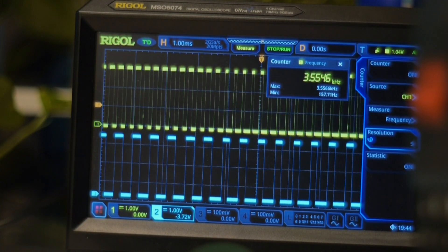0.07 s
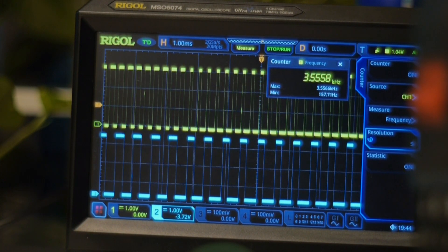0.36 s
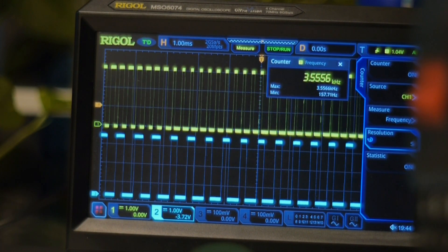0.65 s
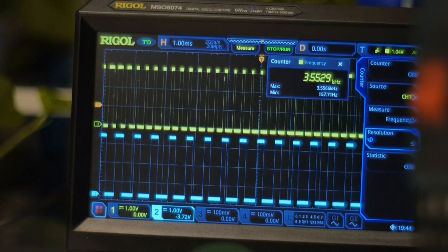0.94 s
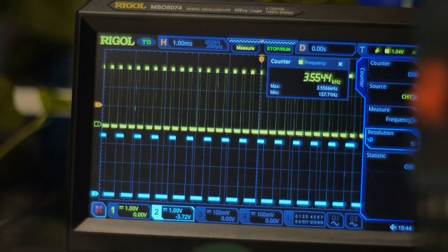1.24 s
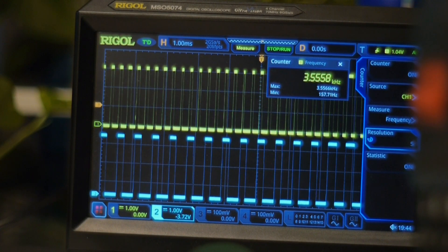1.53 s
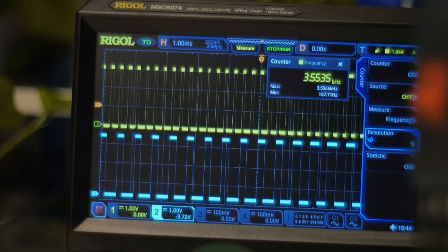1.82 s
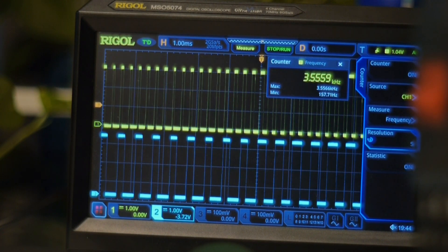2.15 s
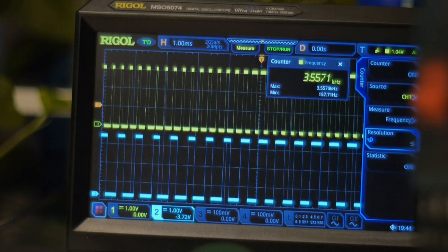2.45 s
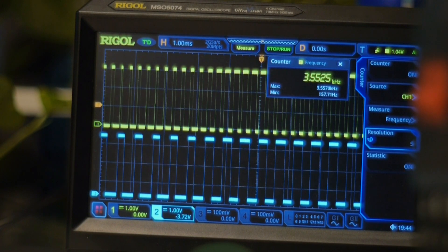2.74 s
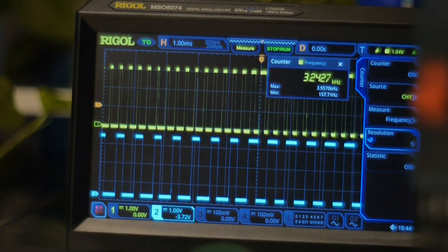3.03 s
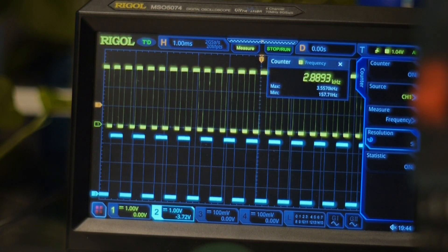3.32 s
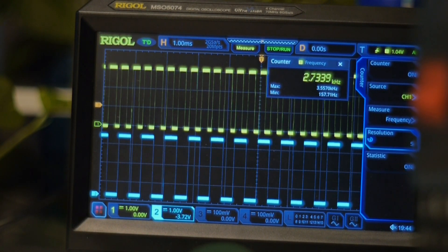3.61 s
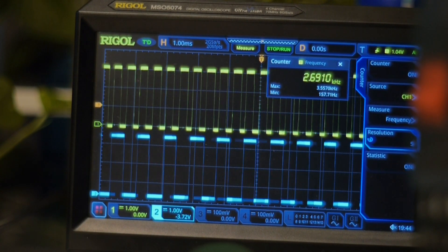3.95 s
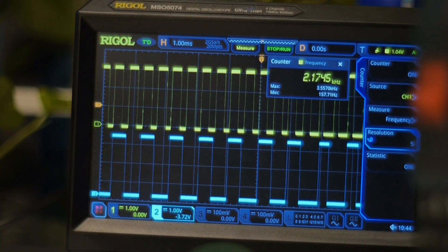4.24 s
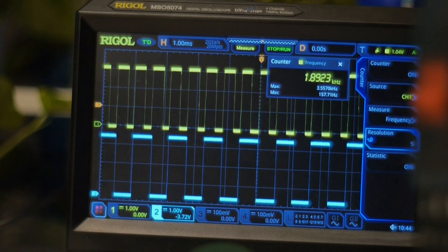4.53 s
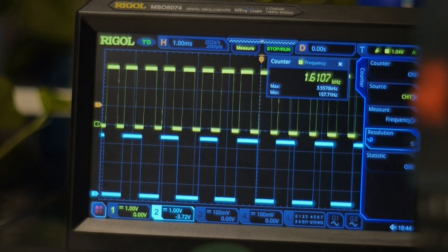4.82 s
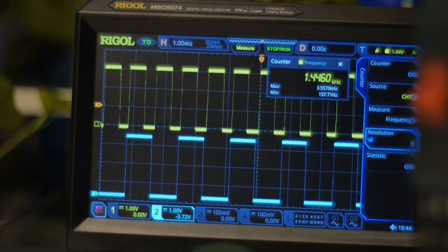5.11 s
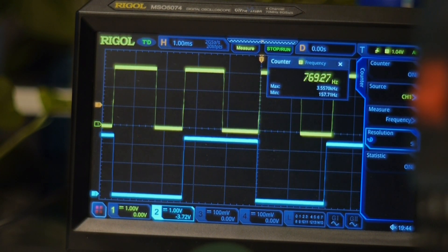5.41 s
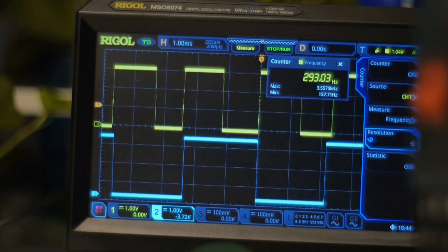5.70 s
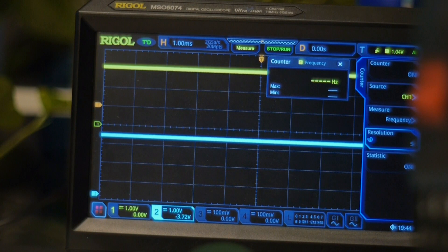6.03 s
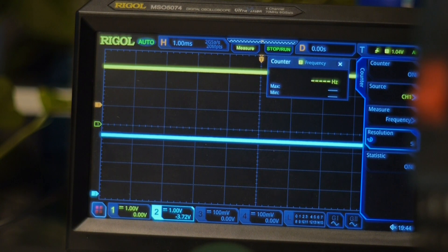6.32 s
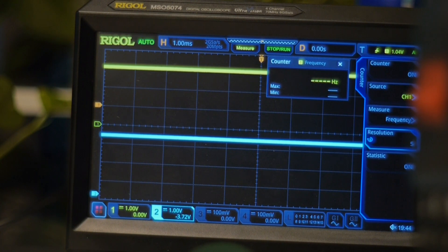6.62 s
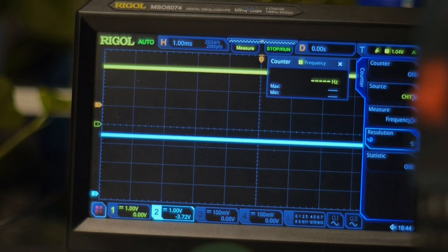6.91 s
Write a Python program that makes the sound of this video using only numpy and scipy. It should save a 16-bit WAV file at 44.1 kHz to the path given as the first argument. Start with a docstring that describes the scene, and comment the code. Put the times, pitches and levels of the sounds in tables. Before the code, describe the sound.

A small electric motor spins a disk at high speed, its sliding contacts hissing under a steady high whine. After nearly three seconds it slows in stages, the whine gliding down and the hiss growing duller and weaker. The rotor catches with a ringing metallic click, followed by a soft knock as the mount settles. Faint ventilation remains in the quiet room, heard in stereo.

```python
"""A bench in a quiet, ventilated room, in stereo. A small electric motor spins a disk at 430 rev/s,
slows in stages and stops. Its sliding contacts hiss through the housing's resonances and keep the disk
ringing. Multiples of the shaft rate whine and glide down; the bench trembles faintly.
The rotor catches with a ringing metallic click, then the mount settles with a soft knock."""
import sys
import numpy as np
from scipy import signal
from scipy.fft import rfft, irfft, next_fast_len
from scipy.io import wavfile
from scipy.ndimage import uniform_filter1d

SR = 44100
rng = np.random.default_rng(int(sys.argv[2]) if len(sys.argv) > 2 else 0)


def store_pcm(level_fs):
    """Save levels as 16-bit WAV."""
    pcm = np.round(np.clip(level_fs, -1, 1) * 32767).astype(np.int16)
    wavfile.write(sys.argv[1], SR, np.atleast_2d(pcm).T)


N = 311327
TIME_S = np.arange(N) / SR
FREQ_HZ = np.maximum(np.arange(N // 2 + 1) * SR / N, 1)
FULL_SPEED_HZ, KNOCK_S = 429.6, 5.6795

# ventilation spectrum: f/Hz, relative level/dB
ROOM_COLOUR = [(15, -55.5), (25, -14), (58, -13), (102, -15), (140, -10), (180, -11.5), (279, -4.5),
               (309, -6.5), (798, -12), (980, -13.5), (1060, -16.5), (1440, -15), (2170, -23.5),
               (4000, -30.5), (11500, -35.5), (15000, -76), (22000, -120)]
# diffuse sound, wider at short wavelengths: f/Hz, side gain/dB
ROOM_SIDE = [(100, -14.5), (400, -13), (900, -17.5), (2000, -10.5), (4000, 6), (12000, -4)]
# spells of bench tremble: centre t/s, length/s, level/dB
TREMBLE_SPELLS = [(3.45, 0.41, -74), (4.13, 0.055, -72), (4.5, 0.22, -75)]
# knock modes: f/Hz, relative level/dB, t60/s
KNOCK_MODES = [(565, -4.5, 0.27), (650, -1, 0.15), (820, -13, .06), (1260, -20, .06), (1800, -18, .06),
               (2500, -11, 0.15)]
# knock noise spectrum: f/Hz, relative level/dB
KNOCK_COLOUR = [(200, -27), (650, -1), (1700, -4), (2600, -3), (4000, -12), (9000, -23), (14000, -34)]
# the stop, light touch then blow: t/s, level/dB
STOP_HITS = [(5.397, -40.5), (5.4008, -31)]
# click noise spectrum: f/Hz, relative level/dB
CLICK_COLOUR = [(100, -30), (450, -18), (700, -8), (1000, -1), (1430, -10), (1720, 7), (2300, -7),
                (2650, 0), (3850, 5), (4400, -13), (4750, -7), (5200, -4), (5500, 4), (6500, -3),
                (7100, 2.5), (8000, -10), (9200, 3.5), (11000, -9.5), (14000, -23)]
# modes of disk and mount: f/Hz, level/dB, t60/s
DISK_MODES = [(1700, -54, .12), (1785, -54, .26), (2015, -58, .13), (2625, -57, .55), (2708, -56.5, .5),
              (3170, -60, .2), (3467, -58, .3), (3780, -54, .1), (5440, -56, .25), (5650, -55, .2),
              (5890, -56, .35), (6255, -61, .32), (7025, -58, .28), (9150, -58, .22), (9615, -62, .2),
              (9890, -61, .2)]
# shaft rate: t/s, f/Hz
SHAFT_SPEED = [(2.0, 429.7), (2.735, 429.6), (2.8, 396.7), (2.9, 368), (3.04, 344), (3.4, 331),
               (3.68, 324.5), (3.75, 315.5), (3.85, 297.5), (3.93, 278), (4.03, 267.5), (4.1, 246),
               (4.2, 229.5), (4.39, 217.6), (4.55, 203.9), (4.7, 187.4), (4.8, 181), (4.85, 174.5),
               (4.95, 150), (5.05, 128), (5.2, 105.1), (5.25, 91.8), (5.3, 67.5), (5.39, 33.7)]
# whines; fractional orders are bearing tones
# order: base level at full speed/dB, change per halving of speed/dB, roughness/1, waver/dB
WHINE_ORDERS = { 1: (-61.5, -24, .067, .8), 4: (-62, -8, .15, 1.1), 8: (-53.3, -24, .27, 1.0),
                11.635: (-57, -18, .4, 2), 12: (-72, -1, .52, 2.3), 12.4: (-72, -3, .85, 2.5),
                12.635: (-58.5, -26, .5, 2.5), 16: (-66, -5, .38, 1.8), 20: (-73, -7, .4, 2.5),
                24: (-79, -1, .8, 2), 26: (-79, -3, .5, 2.5), 28.5: (-81.5, -1, .6, 2),
                29: (-59.6, -10, .3, 2)}
# resonances each whine can drive; order: rows of f/Hz, width/Hz, peak level/dB
WHINE_RESONANCES = { 4: [(1322, 52, -46), (1276, 50, -50.5), (1095, 150, -48.5), (900, 150, -48.5),
                    (805, 70, -48.5), (715, 30, -56), (530, 90, -71), (440, 70, -67)],
                    8: [(3165, 250, -43.5), (3020, 70, -50), (2800, 110, -57), (1735, 90, -53.5),
                    (1590, 100, -50.5), (1130, 90, -62), (900, 130, -57.5)], 12: [(3840, 240, -54.5),
                    (2540, 200, -52), (1540, 200, -53), (1120, 180, -52.5)], 12.4: [(2780, 280, -54.5),
                    (2400, 280, -55), (1720, 150, -57), (1320, 150, -56.5)], 16: [(3760, 320, -48),
                    (3440, 110, -49.5), (3230, 180, -41), (3080, 140, -45.5), (2890, 140, -47),
                    (2660, 300, -55), (1560, 250, -65)], 20: [(6750, 420, -49.5), (4120, 200, -59.5),
                    (3900, 200, -57), (3250, 200, -60)], 24: [(7790, 90, -52), (5400, 240, -53)],
                    26: [(5450, 170, -54)], 28.5: [(3040, 280, -55)], 29: [(10950, 1300, -50.5),
                    (9900, 140, -47), (9740, 90, -45), (9480, 400, -48), (8150, 800, -52.5),
                    (7650, 300, -55)]}
# antiresonance crossed by one low whine: order, f/Hz, width/Hz, gain/dB
WHINE_NULL = (4, 1302.5, 5, -13)
# friction voices; name: limiting level/dB, knee speed/Hz, speed exponent
FRICTION_VOICES = { "rumble": (-57, 180, 1.6), "rush": (-41, 291, 1.17), "hiss": (-36, 309, 1.41),
                   "chatter": (-57, 58, 0.71)}
# rumble and rush spectrum: f/Hz, relative level/dB
RUSH_COLOUR = [(60, -27), (200, -22.5), (280, -15), (330, -2.5), (420, -7), (570, -6), (740, -6.5),
               (950, 1), (1900, -1.8), (2400, 0.5), (3400, -0.5), (4500, -3.5), (5200, -3.5), (7000, -36)]
# hiss spectrum: f/Hz, relative level/dB
HISS_COLOUR = [(3500, -28.5), (4400, -13), (4800, -5), (5800, -1.5), (7100, -1), (7450, -4), (8600, -3.5),
               (9500, 3), (10400, -2), (11000, -7), (11900, -4), (12700, -10), (13700, -16.5), (14800, -51)]
# housing resonances (negative: antiresonances): f/Hz, width/Hz, gain/dB
HOUSING_MODES = [(380, 40, 2), (490, 30, -3.5), (540, 45, 2.5), (592, 35, -5), (630, 30, 3), (890, 50, 3),
                 (950, 30, -3), (1000, 50, 3.5), (1045, 20, 3), (1072, 20, -3), (1100, 18, 5),
                 (1136, 25, 4.5), (1182, 20, -3), (1325, 30, 4.5), (1635, 55, 4.5), (2000, 80, 2),
                 (2230, 70, 3), (2490, 200, 3), (2700, 60, -3), (3020, 70, 4), (3790, 120, 3.5),
                 (3985, 30, -7), (4645, 35, -6), (4790, 60, 3), (5315, 35, 5), (5435, 70, 6),
                 (5540, 30, -9), (5623, 35, 7), (5900, 90, 5.5), (6210, 100, 2), (6890, 90, 5),
                 (7050, 200, 2), (7730, 260, 5), (8540, 120, 2), (9210, 120, 5), (9910, 70, 5),
                 (10208, 35, 5), (10690, 160, 3), (11400, 250, 2)]
# motor's stereo image: f/Hz, side gain/dB, left minus right/dB
MOTOR_IMAGE = [(100, -17, 0), (400, -27, 0), (1100, -42, 0), (1800, -38, 0), (2300, -16.5, -.2),
               (4300, -10, -.3), (7000, -8, -.5), (9800, -7.6, -3.0), (13000, -6.3, -4.3)]
# treble phase between the microphone ports: f/Hz, left minus right/rad
PORT_PHASE = [(5800, 0), (7500, -.25), (10500, -1.0), (11800, .7), (14000, 0)]


def undb(db):
    """Decibels to gain."""
    return 10 ** (np.asarray(db) / 20)


def colour(rows, column=1):
    """Frequency table column, per bin."""
    rows = np.array(rows)
    return np.interp(np.log(FREQ_HZ), np.log(rows[:, 0]), rows[:, column])


def shape(x, gain):
    """Filter by a gain per bin."""
    size = next_fast_len(N, True)
    bins_hz = np.arange(size // 2 + 1) * SR / size
    return irfft(rfft(x, size) * np.interp(bins_hz, FREQ_HZ, gain), size)[:N]


def unit_shape(x, gain):
    """Filter, then scale to rms 1."""
    x = shape(x, gain)
    return x / np.sqrt(np.mean(x ** 2))


def peak(f_hz, centre_hz, width_hz):
    """Resonance curve of height 1; full width at half height."""
    return 1 / (1 + (2 * (f_hz - centre_hz) / width_hz) ** 2)


def bell(x, centre, width):
    """Gaussian of height 1."""
    return np.exp(-(2 * (x - centre) / width) ** 2)


def noise():
    """White noise."""
    return rng.standard_normal(N)


def walk(rate_hz):
    """Random wander, spread near 1."""
    points = rng.standard_normal(N // 8)
    return np.interp(TIME_S * rate_hz, np.arange(len(points)), points)


def decay(start_s, t60_s):
    """Exponential decay from start_s."""
    return (TIME_S >= start_s) * np.exp(-np.log(1000) * np.maximum(TIME_S - start_s, 0) / t60_s)


def ring(start_s, modes, beat_depth=0.6):
    """Struck modes; close neighbours make each beat."""
    age_s = TIME_S[TIME_S >= start_s][:SR] - start_s
    tones = 0
    for hz, db, t60_s in modes:
        beat = 1 + beat_depth * np.sin(2 * np.pi * rng.uniform(11, 53) * age_s)
        tones += undb(db - 60 * age_s / t60_s) * np.sin(2 * np.pi * hz * age_s) * beat
    before = np.sum(TIME_S < start_s)
    return np.pad(tones, (before, N - before - len(age_s)))


def speed_hz():
    """Shaft rate, per sample."""
    return np.interp(TIME_S, *np.transpose(SHAFT_SPEED))


def running(stop_s=5.405, ramp_s=.01):
    """1 while the shaft turns, 0 once stopped."""
    return np.clip((stop_s - TIME_S) / ramp_s, 0, 1)


def room_tone(mid_db=-67.5):
    """Steady ventilation noise from all sides."""
    mid, side = (unit_shape(noise(), undb(colour(ROOM_COLOUR))) * undb(mid_db) for _ in range(2))
    side = shape(side, undb(colour(ROOM_SIDE)))
    return np.array([mid + side, mid - side])


def reflections(x, count=8, first_s=.006, last_s=.05, drift_hz=9):
    """Delayed copies off nearby surfaces, each wandering in strength."""
    lags = (rng.uniform(first_s, last_s, count) * SR).astype(int)
    return sum(np.pad(x, (lag, 0), mode="reflect")[:N] * walk(drift_hz) for lag in lags) / np.sqrt(count)


def stereo(mid, scattered):
    """Scattered sound makes the treble differ between the two ports."""
    side = shape(scattered, undb(colour(MOTOR_IMAGE)))
    lean = undb(colour(MOTOR_IMAGE, column=2) / 2) * np.exp(1j * colour(PORT_PHASE) / 2)
    return np.array([shape(mid + side, lean), shape(mid - side, 1 / lean)])


def bench(sway_hz=42, sway_db=-83, boom_hz=140, boom_db=-77, knee_hz=200):
    """The motor shakes two low bench resonances."""
    sway = unit_shape(noise(), peak(FREQ_HZ, sway_hz, width_hz=28))
    boom = unit_shape(noise(), peak(FREQ_HZ, boom_hz, width_hz=26))
    spells = sum(undb(db) * bell(TIME_S, centre_s, length_s) for centre_s, length_s, db in TREMBLE_SPELLS)
    shaking = np.minimum(speed_hz() / knee_hz, 1) * running()
    return sway * spells + (sway * undb(sway_db) + boom * undb(boom_db)) * shaking


def knock(tap_db=-56, tail_db=-68, ring_db=-56, rise_s=.002):
    """The mount settles: dull tap, short ring."""
    envelope = undb(tap_db) * decay(KNOCK_S, t60_s=.026) + undb(tail_db) * decay(KNOCK_S, t60_s=.3)
    envelope = uniform_filter1d(envelope, int(rise_s * SR) + 1)
    tap = envelope * unit_shape(noise(), undb(colour(KNOCK_COLOUR)))
    onset = np.clip((TIME_S - KNOCK_S) / rise_s, 0, 1)
    return tap + undb(ring_db) * onset * ring(KNOCK_S, KNOCK_MODES)


def stop_click(crack_t60_s=0.02, rattle_gain_db=-17, rattle_t60_s=0.42, rise_s=0.0024):
    """The rotor catches: short crack, dense rattle, ringing disk."""
    envelope = sum(undb(db) * (decay(t_s, crack_t60_s) + undb(rattle_gain_db) * decay(t_s, rattle_t60_s))
                   for t_s, db in STOP_HITS)
    envelope = uniform_filter1d(envelope, int(rise_s * SR) + 1)
    crack = envelope * unit_shape(noise(), undb(colour(CLICK_COLOUR)))
    return crack + ring(STOP_HITS[-1][0], DISK_MODES)


def whine(turns, waver_hz=22, flutter_hz=220, fade_below_hz=62):
    """Shaft-locked tones swell through resonances, roughened by bearing play; they die at a crawl."""
    shaft_hz = speed_hz()
    halvings = np.log2(FULL_SPEED_HZ / shaft_hz)
    null_order, null_hz, null_width_hz, null_db = WHINE_NULL
    tones = 0
    for order, (full_db, halving_db, rough, waver_db) in WHINE_ORDERS.items():
        tone_hz = order * shaft_hz
        power = undb(full_db + halving_db * halvings) ** 2
        for hz, width_hz, peak_db in WHINE_RESONANCES.get(order, []):
            power += (undb(peak_db) * peak(tone_hz, hz, width_hz)) ** 2
        if order == null_order:
            power *= undb(null_db * bell(tone_hz, null_hz, null_width_hz)) ** 2
        phase_rad = 2 * np.pi * order * turns + rough * walk(flutter_hz)
        tone = np.sin(phase_rad) * (1 + rough * walk(flutter_hz))
        tones += np.sqrt(2 * power) * tone * undb(waver_db * walk(waver_hz))
    return tones * running() / (1 + (fade_below_hz / shaft_hz) ** 6)


def contact_gain(voice):
    """A friction voice grows with speed and levels off above its knee."""
    limit_db, knee_hz, exponent = FRICTION_VOICES[voice]
    return undb(limit_db) / np.sqrt(1 + (knee_hz / speed_hz()) ** (2 * exponent))


def chatter(width_hz=130, cutoff_hz=3500, burst_db=5.5):
    """Uneven rubbing drives the disk's lower modes, damped by the contact."""
    modes = sum(peak(FREQ_HZ, hz, width_hz) for hz, _, _ in DISK_MODES)
    rubbing = noise() * undb(burst_db * walk(rate_hz=60))
    return unit_shape(rubbing, modes / (1 + (FREQ_HZ / cutoff_hz) ** 8)) * contact_gain("chatter")


def friction(turns, grain_db=1.0, flutter_db=0.51, split_hz=700, dulling=0.459,
             dip_s=3.08, dip_length_s=0.35, dip_db=-1.15):
    """Countless tiny slips sound through housing and disk; slower slips are duller."""
    housing = undb(sum(db * peak(FREQ_HZ, hz, width_hz) for hz, width_hz, db in HOUSING_MODES))
    pressure = undb(grain_db * walk(rate_hz=2500) + flutter_db * walk(rate_hz=30.05))
    pressure *= 1 + 0.04 * np.sin(2 * np.pi * turns)
    low_share = 1 / (1 + (FREQ_HZ / split_hz) ** 8)
    body = undb(colour(RUSH_COLOUR)) * housing
    rumble = unit_shape(noise(), body * np.sqrt(low_share)) * contact_gain("rumble")
    rush = unit_shape(noise() * pressure, body * np.sqrt(1 - low_share)) * contact_gain("rush")
    slips = noise() * pressure
    slowness = 1 - speed_hz() / FULL_SPEED_HZ
    slips += dulling * slowness * (np.roll(slips, 1) + np.roll(slips, -1) - slips)
    hiss = unit_shape(slips, undb(colour(HISS_COLOUR)) * housing) * contact_gain("hiss")
    dip = undb(dip_db * bell(TIME_S, dip_s, dip_length_s))  # after the first drop in speed
    return (rumble + rush + hiss + chatter()) * dip * running()


def scene(speed_wander=0.00055, reflected_db=-7):
    """The shaft drives friction and whine; reflections beat against the whine more as it slows."""
    turns = np.cumsum(speed_hz() * (1 + speed_wander * walk(rate_hz=9))) / SR
    direct, scattered = (friction(turns) + stop_click() for _ in range(2))
    tones = whine(turns)
    reflected_gain = undb(reflected_db) * np.clip(np.log2(FULL_SPEED_HZ / speed_hz()), .2, 1)
    mid = direct + tones + reflected_gain * reflections(tones) + knock() + bench()
    return stereo(mid, scattered + reflections(tones)) + room_tone()


def record(dry):
    """Steep low-pass at 14.9 kHz."""
    return signal.sosfilt(signal.ellip(10, .1, 80, 14900, fs=SR, output="sos"), dry)


dry = scene()
out = record(dry)
store_pcm(out)
```